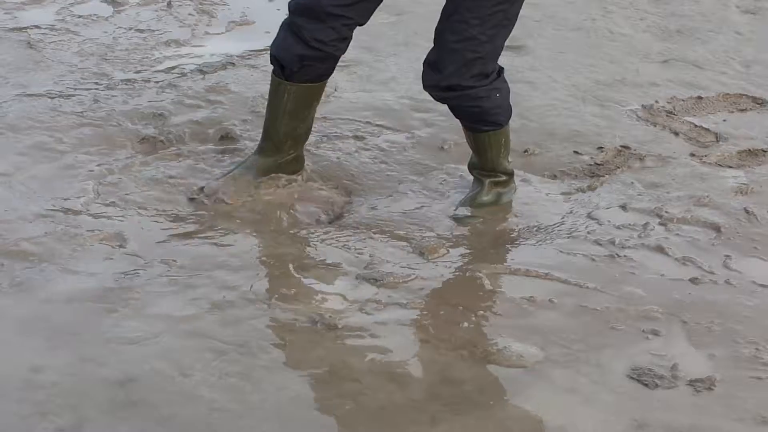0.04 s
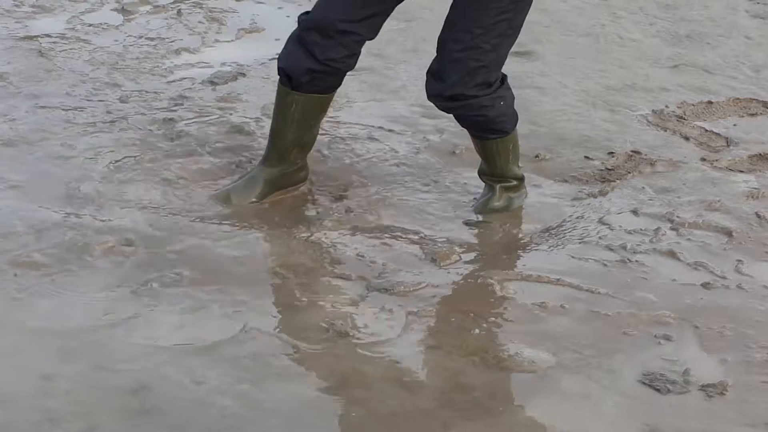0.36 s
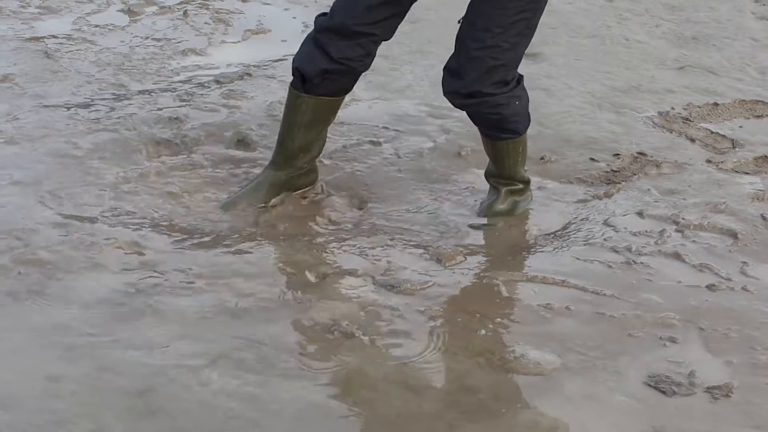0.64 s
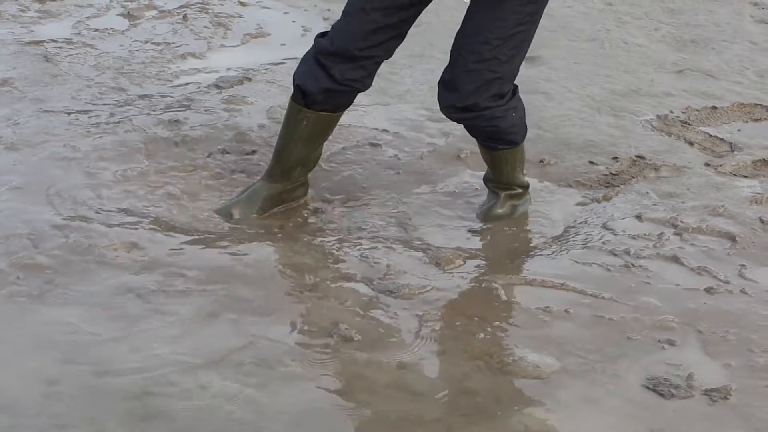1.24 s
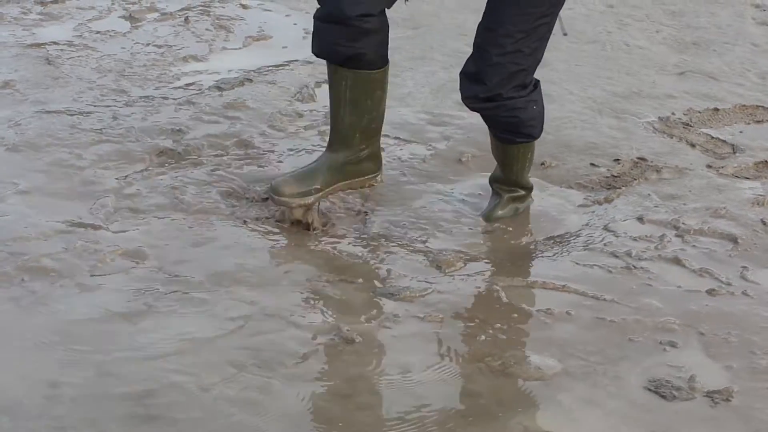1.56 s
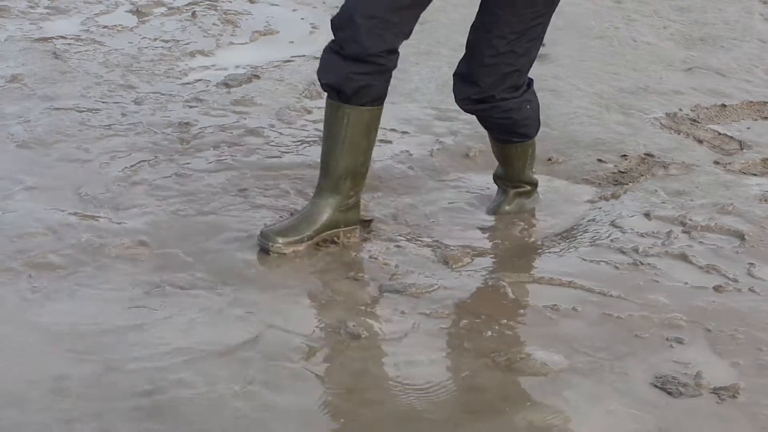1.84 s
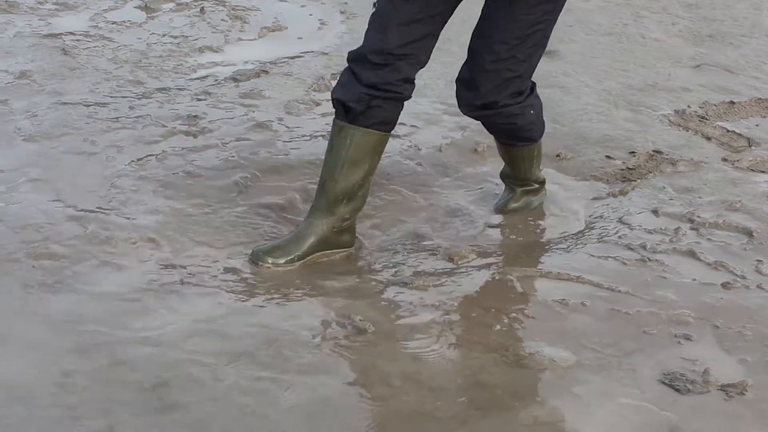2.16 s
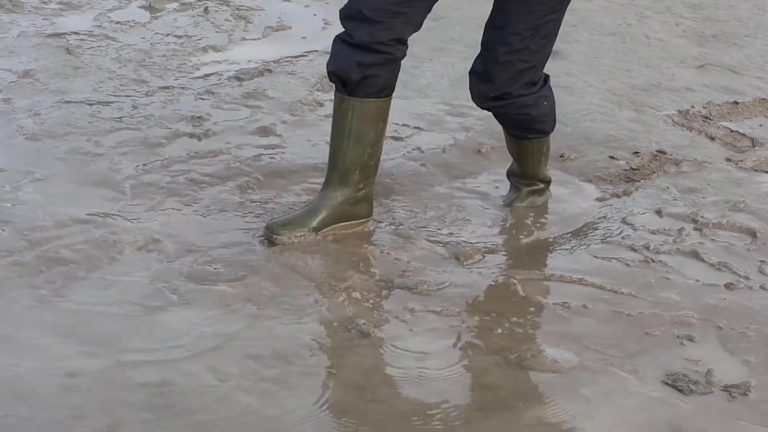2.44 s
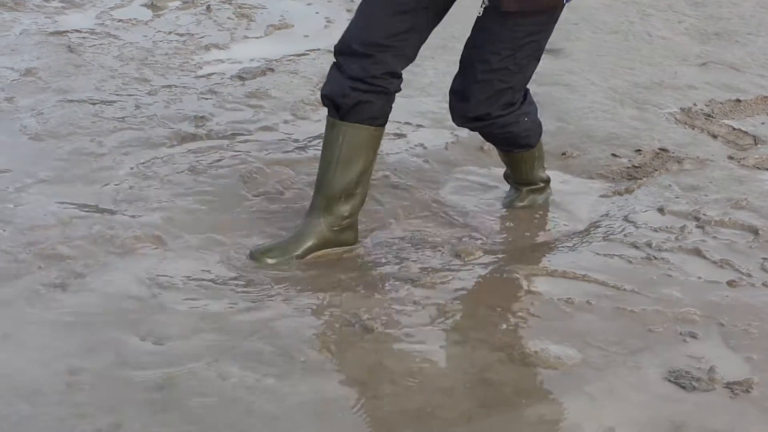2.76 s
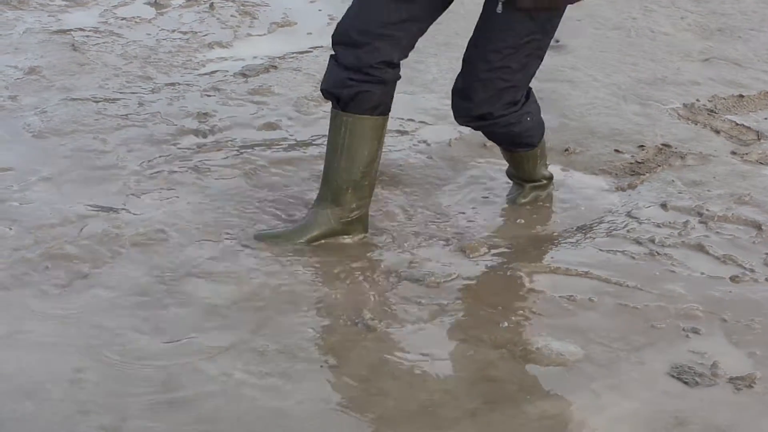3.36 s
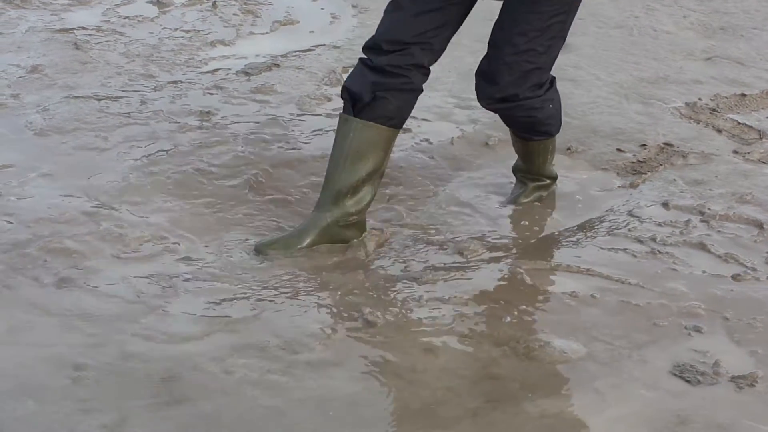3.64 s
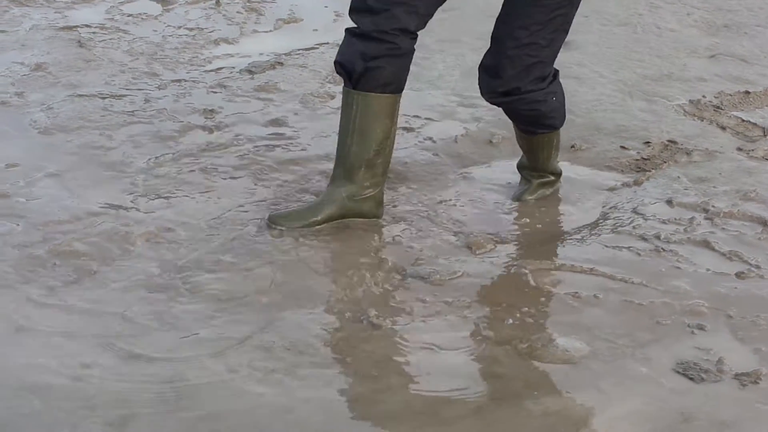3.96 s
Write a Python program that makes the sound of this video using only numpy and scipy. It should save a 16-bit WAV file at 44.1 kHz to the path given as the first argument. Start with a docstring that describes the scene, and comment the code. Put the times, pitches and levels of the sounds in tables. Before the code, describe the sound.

Mud squelches and pops in scattered bursts as a rubber boot presses into a waterlogged flat, with a few drips. A brief plastic clatter comes first, and the camera's own motor whirrs and ticks rapidly over everything.

```python
"""A rubber boot shifts in wet mud: bursting bubbles squelch, drops fall and its weight thuds softly.
A camera is louder than the mud. It starts with a thump and a clatter of plastic parts, and its
drive whirrs, ticks steadily and whistles faintly. Sounds carried by the camera's body reach the
two channels in opposite polarity: one channel swings up while the other swings down."""
import sys
import numpy as np
from scipy import signal
from scipy.fft import rfft, irfft, next_fast_len
from scipy.io import wavfile
from scipy.ndimage import uniform_filter1d, map_coordinates

SR = 44100
rng = np.random.default_rng(int(sys.argv[2]) if len(sys.argv) > 2 else 0)


def generate_wav(sig):
    """Save sig (samples, or channels by samples) to the path in sys.argv[1] as 16-bit PCM at SR."""
    pcm = np.round(np.clip(np.atleast_2d(sig).T, -1, 1) * 32767).astype(np.int16)
    wavfile.write(sys.argv[1], SR, pcm)


N = 176400
TURN_S = 0.04  # one turn of the camera's drive
CRACKLE_RIGHT_DB = -22.5  # crackles, drops and scrapes are heard mostly on the left

# Tone colour of bright crackles and scrapes: frequency_hz, level_db
BRIGHT_COLOUR = [(2000, 2), (3500, -1.5), (5200, -1.5), (5650, 9), (6100, 4), (9600, 8), (11000, 1),
                 (13000, -8.5)]
# Tone colour of lower smacks and rubs: frequency_hz, level_db
DULL_COLOUR = [(400, -33), (1200, 27.5), (1800, 33.5), (2400, 23), (3500, -15)]
# Fine ticks within each turn of the drive: start_s, level_db
FINE_TICKS = [(0.0153, -53), (.0172, -51), (.0365, -50), (0.0352, -50.5)]


def amp(db):
    """Turn decibels into a gain."""
    return 10 ** (np.asarray(db) / 20)


def unit(x):
    """Scale a sound to an average (rms) level of 1."""
    return x / np.sqrt(np.mean(x ** 2) + 1e-20)


def along(points, hz):
    """Read a curve of (frequency, value) points at hz, on a log frequency axis."""
    frequencies, values = np.transpose(points)
    return np.interp(np.log(hz + 1), np.log(frequencies + 1), values)


def filtered(x, response):
    """Multiply each frequency in a sound by response(hz)."""
    size = next_fast_len(N + SR // 4)
    return irfft(rfft(x, size) * response(np.fft.rfftfreq(size, 1 / SR)), size)[..., :N]


def coloured(x, points):
    """Give a sound a tone colour and an average level of 1."""
    return unit(filtered(x, lambda hz: amp(along(points, hz))))


def wobble(rate):
    """A smooth curve through `rate` random values a second."""
    return map_coordinates(rng.standard_normal(int(N * rate / SR) + 4), [np.arange(N) * rate / SR])


def ring(hz, t60, rise_s=0.0001):
    """A vibration, heard as its speed, that starts softly and fades by 60 dB in t60 seconds."""
    t = np.arange(SR // 5) / SR
    swing = np.sin(2 * np.pi * hz * t) * 1000 ** (-t / t60) * (1 - np.exp(-t / rise_s))
    return np.diff(swing, prepend=0) * SR / (2 * np.pi * hz)


def add(track, start_s, sound):
    """Mix a sound into a track."""
    part = track[..., max(round(start_s * SR), 0):][..., :sound.shape[-1]]
    part += sound[..., :part.shape[-1]]


def opposed(x, left_db=0, right_db=0):
    """Make two channels, the left one upside down."""
    return np.array([-amp(left_db) * x, amp(right_db) * x])


def pops(per_s):
    """Tiny clicks of uneven size at random times."""
    clicks = (rng.random(N) < per_s / SR) * rng.choice([-1, 1], N)
    return clicks * amp(3 * np.minimum(rng.exponential(size=N), 3))


def bursts(rows, rise_s=0.002, fall_s=0.002):
    """A loudness curve that rises, holds and falls for each (start_s, length_s, level_db)."""
    level, t = np.zeros(N), np.arange(SR // 5) / SR
    for start, length, db in rows:
        fall = np.exp(-np.maximum(t - length / 2, 0) / (fall_s + length / 4))
        add(level, start, amp(db) * np.minimum(t / rise_s, 1) * fall)
    return level


def whirr(level_db=-44.5, wobble_db=1.5):
    """The camera's drive makes a rolling noise with two wavering tones."""
    # Tone colour of the noise: frequency_hz, left_db, right_db
    colour = [(70, 2, 0.5), (132, -11.5, -1), (300, 3.5, 3.5), (426, 6, -3), (553, 5, 1.5), (736, 3, -2.5),
              (923, 0.5, 2.5), (1144, -2.5, -2.5), (1596, -6, 2.5), (1840, -7.5, -8.5), (2500, -17.5, -9.5),
              (3650, -26, -17), (4720, -32, -24), (5500, -19.5, -24), (7600, -19, -21.5), (8100, -23, -30),
              (10900, -29, -34)]
    # How alike the channels are: frequency_hz, likeness (-1 opposite, 0 unrelated)
    likeness = [(60, -0.79), (500, -0.64), (2500, -0.41), (6000, -0.027)]
    # Tones of the drive: pitch_hz, left_db, right_db
    tones = [(152.5, -68, -59), (507.6, -65.5, -54.5)]

    def shares(hz):
        angle = np.arccos(np.clip(along(likeness, hz), -1, 1)) / 2
        return np.array([np.cos(angle), np.sin(angle)])

    common, opposite = filtered(rng.standard_normal((2, N)), shares)
    noise = np.array([common + opposite, common - opposite])
    bands, left, right = np.transpose(colour)
    noise = filtered(noise, lambda hz: amp([along(np.c_[bands, db], hz) for db in (left, right)]))
    out = unit(noise) * amp(level_db + wobble_db * wobble(30.38))
    for hz, left_db, right_db in tones:
        tone = np.sin(2 * np.pi * hz * np.arange(N) / SR + 0.39 * wobble(5.58))
        tone *= amp(1.2 * wobble(6.42))
        out += opposed(unit(tone), left_db, right_db)
    return out


def ticking(jitter_s=0.0003, spread_db=1.8, detune=0.026):
    """Every turn of the drive knocks its frame twice and gives two pairs of fine ticks."""
    # Knocks within each turn: start_s, level_db
    turn_knocks = [(-.0004, 0.5), (.0038, -7)]
    # Notes the frame rings at: pitch_hz, ring_s, left_db, right_db
    frame_notes = [(153, 0.044, -49.5, -47), (301, 0.029, -47.5, -35), (670, 0.018, -37.5, -40),
                   (1340, 0.017, -38, -28), (1511, 0.034, -43.5, -34.5), (2090, 0.0047, -57, -32)]
    # Tone colour of the fine ticks: frequency_hz, level_db
    tick_colour = [(1000, -12.5), (2200, 5), (4400, -14), (6000, 1.5), (9000, -13), (13000, -46)]
    turns, out = np.arange(0, N / SR, TURN_S), np.zeros((2, N))
    knocks = [(turn + s + jitter_s * rng.normal(), db) for turn in turns for s, db in turn_knocks]
    for hz, t60, left_db, right_db in frame_notes:
        for start, db in knocks:
            note = ring(hz * (1 + detune * rng.normal()), t60, rise_s=0.0006)[:SR // 20]
            add(out, start, -amp(db + spread_db * rng.normal()) * opposed(note, left_db, right_db))
    tick_level = np.zeros(N)
    fall = np.exp(-np.arange(SR // 100) / SR / 0.00099)
    for turn in turns:
        for offset, db in FINE_TICKS:
            start = turn + offset + 2 * jitter_s * rng.normal()
            add(tick_level, start, amp(db + 2 * spread_db * rng.normal()) * fall)
    hiss = coloured(rng.standard_normal((2, N)), tick_colour)
    return out + tick_level * hiss * amp([[0], [3]])  # ticks are louder on the right


def whistles(detune=0.06):
    """Faint, rough, high whistles come and go by chance with each half turn of the drive."""
    # Thin whistles: pitch_hz, level_db, chance (0 to 1)
    notes = [(6640, -61, .35), (7660, -58.5, 0.5)]
    t, out = np.arange(N) / SR, np.zeros(N)
    half_turn = (2 * (t - FINE_TICKS[0][0]) / TURN_S + 2).astype(int)
    for hz, db, chance in notes:
        dice, bend = rng.random((2, half_turn[-1] + 1))[:, half_turn]
        sounding = uniform_filter1d(1. * (dice < chance), size=60)
        pitch = hz * (1 + detune * (bend - 0.5))
        roughness = 0.8 * wobble(500)
        out += amp(db) * sounding * np.sin(2 * np.pi * np.cumsum(pitch) / SR + roughness)
    return opposed(out, left_db=-33)


def thump(start_s=0.0778, gain_db=1.5, cutoff_hz=690):
    """One push as the camera starts, dull because the contact is soft."""
    # Notes of the thump: pitch_hz, level_db, ring_s
    notes = [(364, -2.5, 0.0063), (287, -9.5, 0.015)]
    out = np.zeros(N)
    add(out, start_s, -sum(amp(gain_db + db) * ring(hz, t60) for hz, db, t60 in notes))
    return opposed(filtered(out, lambda hz: 1 / (1 + (hz / cutoff_hz) ** 4)), left_db=-10)


def clatter(crack_hz=5720, crack_s=0.0055, db_per_octave=9):
    """Plastic parts rub, scrape and snap home, leaving a thin ring in the camera's shell."""
    # Snaps: start_s, level_db, favoured_pitch_hz, crack_db
    snaps = [(0.1452, 1.5, 1040, -21), (0.1601, -19, 1500, -31), (0.167, 1.5, 2260, -15),
             (.1702, 2.5, 1490, -19), (0.1732, -1, 1680, -39), (0.1798, -15, 1900, -10.5),
             (0.182, 4, 1850, 3.5), (0.1859, 6.5, 1630, -26)]
    # Notes the shell rings at: pitch_hz, level_db, ring_s
    shell_notes = [(286, 10, 0.0091), (725, -5, 0.015), (1020, 4.5, 0.008), (1320, -4, 0.013),
                   (1652, -3.5, 0.016), (1827, 1.5, 0.0088), (2517, -4.5, 0.011), (2467, -29.5, .12),
                   (3480, -13, 0.011)]
    # Dry scrapes: start_s, length_s, level_db
    scrapes = [(.097, 0.004, -30), (.146, 0.0098, -31), (.166, 0.01, -24.5)]
    # Lower rubs as the parts start to move: start_s, length_s, level_db
    rubs = [(.068, 0.011, -36.5), (.134, 0.01, -33.5)]
    # How far the channels drift from being exact opposites: frequency_hz, shift_radians
    phase_shift = [(1000, 0.25), (6000, 0.78)]
    out, t = np.zeros(N), np.arange(SR // 5) / SR
    for start, db, favoured_hz, crack_db in snaps:
        shell = 0
        for hz, note_db, t60 in shell_notes:
            octaves_away = abs(np.log2(hz / favoured_hz))
            shell += amp(note_db - db_per_octave * octaves_away) * ring(hz, t60, rise_s=0.001)
        hiss = amp(-13) * rng.standard_normal(len(t)) * 1000 ** (-t / crack_s)
        crack = ring(crack_hz, crack_s) + hiss
        add(out, start, amp(crack_db) * crack - amp(db) * shell)
    scrape = bursts(scrapes) * coloured(rng.standard_normal(N), BRIGHT_COLOUR)
    rub = bursts(rubs) * coloured(rng.standard_normal(N), DULL_COLOUR)
    left, right = opposed(out + rub, left_db=-10)
    left = filtered(left, lambda hz: np.exp(1j * along(phase_shift, hz)))
    return np.array([left, right]) + opposed(scrape, right_db=CRACKLE_RIGHT_DB)


def mud(pops_per_s=4500, stray_db=-68, colour_count=5, spread_db=2.5):
    """Each squelch is a cloud of bursting bubbles over a lower smack; stray bubbles pop in between."""
    # Squelches: start_s, length_s, crackle_db, smack_db
    squelches = [(0.379, 0.005, -33.5, -41), (0.723, 0.014, -42, -48), (0.744, 0.065, -54, -55),
                 (1.133, 0.03, -44, -43), (1.184, 0.011, -35, -46.5), (1.202, 0.037, -50.5, -49),
                 (1.481, 0.01, -44, -34.5), (1.531, 0.026, -42.5, -48), (1.552, 0.029, -33.5, -44),
                 (1.641, 0.012, -38.5, -43), (1.667, 0.0036, -43, -31), (1.681, 0.047, -52.5, -48.5),
                 (1.854, 0.011, -31, -32), (1.87, 0.011, -31, -34.5), (1.983, 0.01, -36, -59),
                 (2.443, 0.074, -50.5, -63), (2.99, 0.0086, -43, -59), (3.116, 0.0067, -39.5, -53),
                 (3.181, 0.01, -37, -57), (3.318, 0.014, -46, -60), (3.554, 0.0043, -40.5, -38),
                 (3.795, 0.0085, -28.5, -57), (3.847, 0.013, -34.5, -45), (3.893, 0.0074, -40, -42.5)]
    rows = np.array(squelches)
    hz, colour_db = np.transpose(BRIGHT_COLOUR)
    crackle = amp(stray_db) * coloured(pops(per_s=120), BRIGHT_COLOUR)
    for k in range(colour_count):  # the squelches take turns among slightly varied colours
        varied = np.c_[hz, colour_db + spread_db * rng.standard_normal(len(hz))]
        crackle += bursts(rows[k::colour_count, :3]) * coloured(pops(pops_per_s), varied)
    smack = bursts(rows[:, [0, 1, 3]]) * coloured(pops(pops_per_s), DULL_COLOUR)
    return opposed(crackle, right_db=CRACKLE_RIGHT_DB) + opposed(smack, right_db=-9)


def droplets():
    """Flung drops land on the water one by one, each with a short ping of its own pitch."""
    # Drops: start_s, level_db, pitch_hz
    drops = [(.707, -33, 9150), (1.1795, -27, 8200), (1.297, -31, 9800), (1.5355, -21, 10300),
             (1.746, -30, 11000), (1.8711, -6, 9700), (2.984, -23, 1000), (3.556, -32, 8450)]
    out = np.zeros(N)
    for start, db, hz in drops:
        add(out, start, amp(db) * ring(hz, t60=0.002))
    return opposed(out, right_db=CRACKLE_RIGHT_DB)


def thuds():
    """Soft low bumps as the weight on the boot shifts."""
    # Bumps: start_s, level_db, pitch_hz
    bumps = [(0.911, -40.5, 86), (1.128, -45.5, 89), (1.248, -41, 89), (1.51, -42.5, 95),
             (2.742, -37.5, 120), (2.829, -40, 124), (2.917, -41.5, 257)]
    # Notes within a bump: pitch_multiple, level_db, ring_s
    notes = [(1, 6, 0.041), (1.7, .5, 0.048), (2.6, -6, 0.036)]
    out = np.zeros(N)
    for start, db, hz in bumps:
        for multiple, note_db, t60 in notes:
            add(out, start, amp(db + note_db) * ring(hz * multiple, t60, rise_s=0.00047))
    return opposed(out, left_db=-14.5)


def scene(start_s=0.0576, rise_s=0.0047):
    """Everything fades in quickly as the camera starts."""
    fade_in = np.clip((np.arange(N) / SR - start_s) / rise_s, 0, 1)
    boot = mud() + droplets() + thuds()
    camera = thump() + clatter() + whirr() + ticking() + whistles()
    return fade_in * (boot + camera)


def record(dry, low_cut_hz=79, high_cut_hz=14000):
    """Cut three narrow bands, soften the treble, flatten overloud peaks and trim both ends of the range."""
    # Bands that are cut out: centre_hz, width_hz
    notches = [(3020, 943), (4020, 428), (5020, 470)]
    # Fading treble: frequency_hz, level_db
    treble = [(10300, 1.5), (11200, -5.5), (11900, -19), (14000, -26)]

    def response(hz):
        dips = [1 - 1j * hz * width / (centre ** 2 - hz ** 2 + 1j * hz * width)
                for centre, width in notches]
        return np.prod(dips, axis=0) * amp(along(treble, hz))

    out = np.clip(filtered(dry, response), -1, 1)
    out = signal.sosfilt(signal.butter(2, low_cut_hz, "high", fs=SR, output="sos"), out)
    return signal.sosfiltfilt(signal.butter(10, high_cut_hz, fs=SR, output="sos"), out)


dry = scene()
out = record(dry)
generate_wav(out)
```